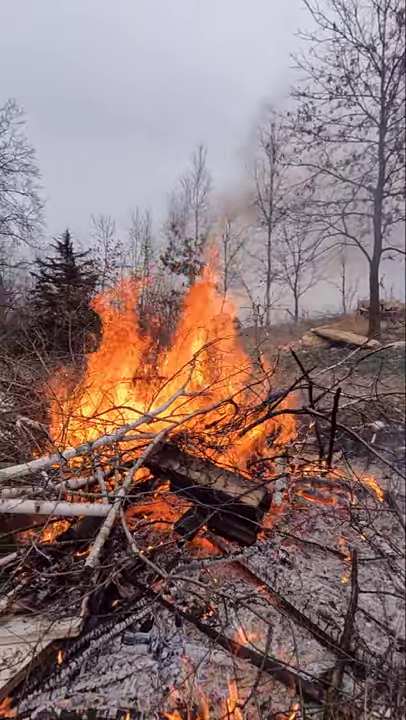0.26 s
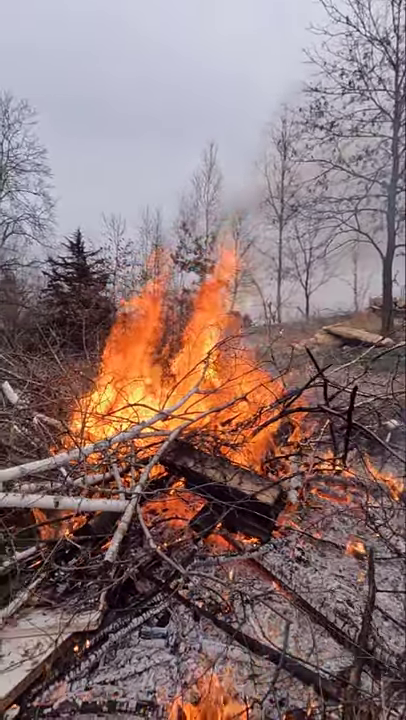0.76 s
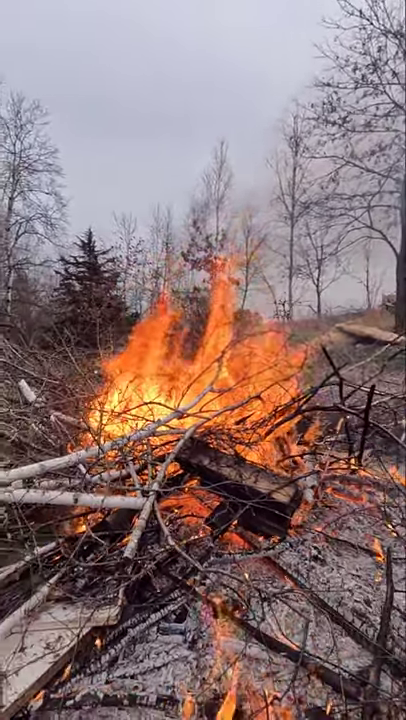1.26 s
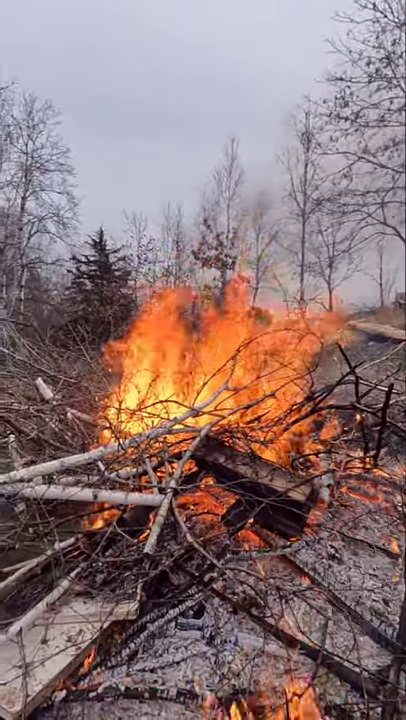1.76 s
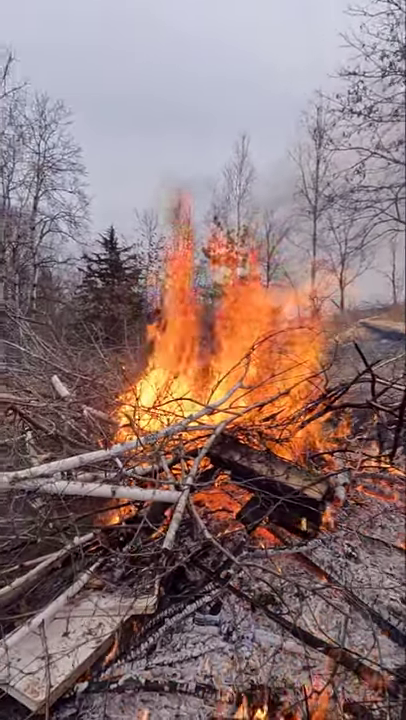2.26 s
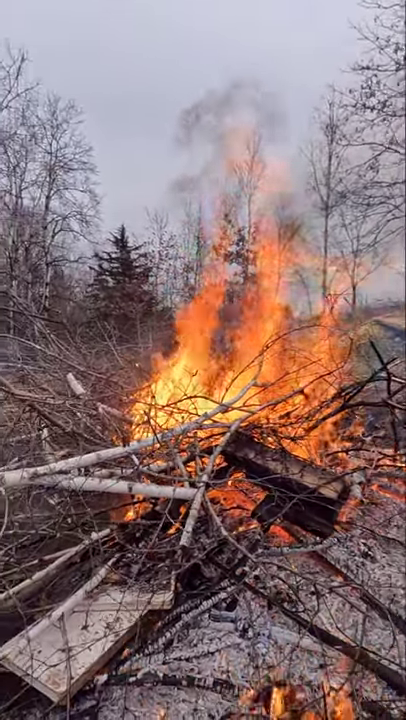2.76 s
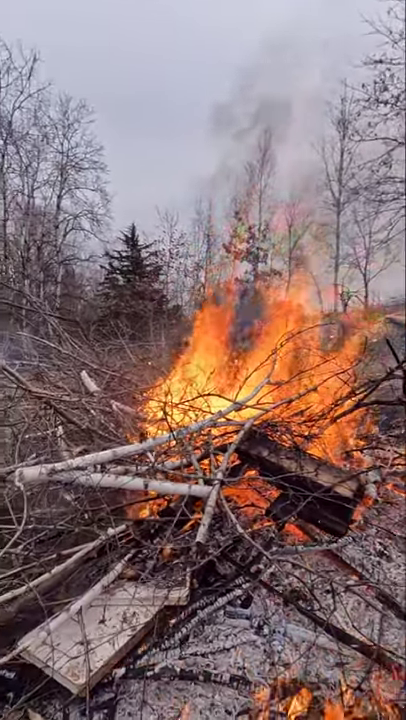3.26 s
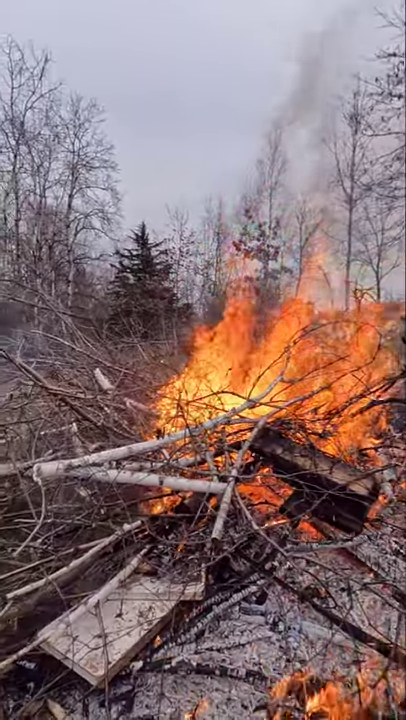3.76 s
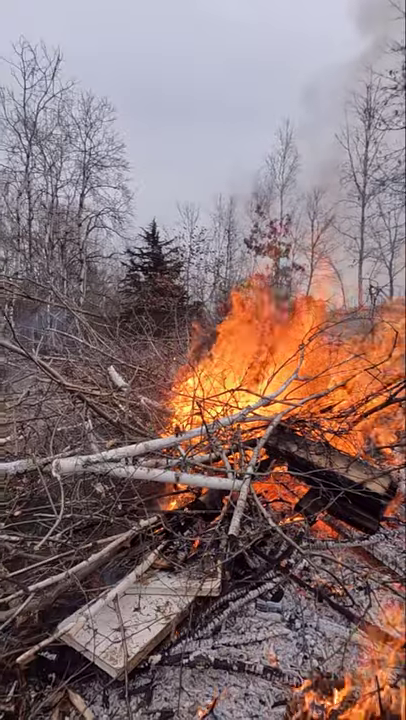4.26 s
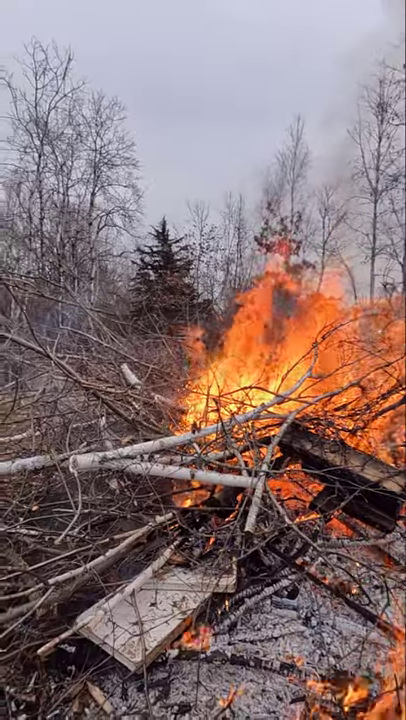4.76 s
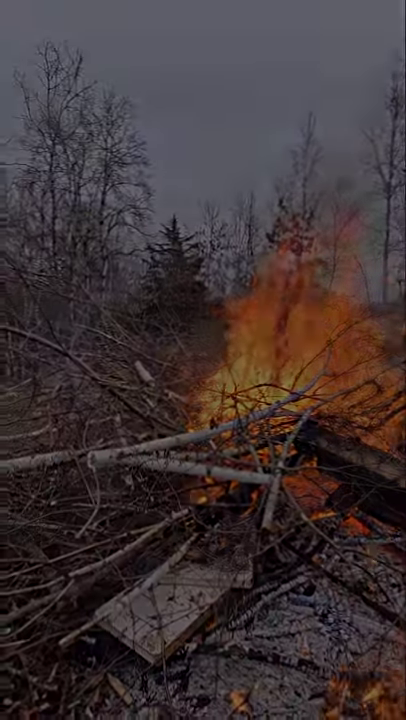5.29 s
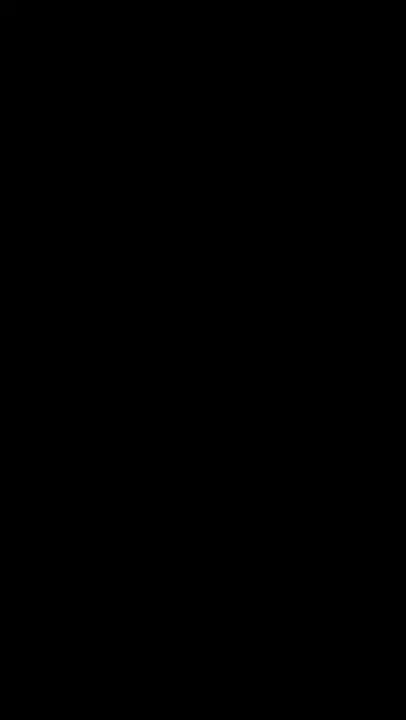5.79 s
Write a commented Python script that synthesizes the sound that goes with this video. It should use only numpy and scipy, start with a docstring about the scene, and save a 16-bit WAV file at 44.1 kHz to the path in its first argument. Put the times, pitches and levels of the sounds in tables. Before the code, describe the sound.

A big heap of cut branches burns in the open, heard from a few metres on a small camera microphone. The flames rush and flutter low and steady while sap hisses softly and twigs tick. Sharp pops burst from the wood several times a second, the louder ones with a small thud and a spitting tail. Steam sputters briefly early on, and the popping grows busiest in the second half.

```python
"""In the open, a few metres from a burning heap of cut branches, on a small camera's microphone.
Pockets of gas burst in the wood: sharp pops with a thud, a spitting tail and an echo off the ground.
The flames rush and flutter in the bass, sap hisses, twigs tick and steam sputters.
Faint thin tones come and go near 10-11 kHz. The microphone port rings near 4 kHz and dips near 9 kHz;
the gain ducks after loud pops. The sound loops after about 4.7 s."""
import sys
import numpy as np
from scipy import signal
from scipy.fft import rfft, irfft, next_fast_len
from scipy.io import wavfile
from scipy.ndimage import uniform_filter1d, minimum_filter1d, map_coordinates

SR = 44100
rng = np.random.default_rng(int(sys.argv[2]) if len(sys.argv) > 2 else 0)


def wav_record(signal):
    """Record a signal, one row per channel, as 16-bit PCM in the file named by sys.argv[1]."""
    frames = np.transpose(np.atleast_2d(signal))
    bounded = np.clip(frames, -1, 1)
    # unit amplitude maps onto the largest positive 16-bit level
    quanta = np.round(bounded * 32767).astype(np.int16)
    wavfile.write(sys.argv[1], SR, quanta)


N = 265923

# gas pockets bursting: t/s, shock level/dB, sharpness/dB, spit level/dB, thud level/dB
BURSTS = [(.0203, -13, 2, -32, -31.5), (0.0663, -36, -6, -44, -53), (0.109, -38, 0, -44, -53),
          (0.211, -35, 7, -62, -40), (0.236, -36, 9.5, -45.5, -39), (0.3558, -9, 0.5, -35, -25.5),
          (0.3567, -19, -1.5, -29, -47), (.403, -49, 3, -37, -42), (0.4987, -27.5, -9.5, -53, -57),
          (0.5363, -27, 8, -44, -30), (0.6911, -7.5, -6.5, -25, -35), (0.6947, -18.5, 8, -33, -26),
          (0.729, -30, -1, -54, -54), (0.7799, -12.5, 5, -39, -23.5), (0.855, -27, 7, -40.5, -55),
          (0.9076, -27.5, 9, -42, -62), (1.0043, -21.5, 10, -35.5, -52), (1.0243, -24.5, 3, -38, -46),
          (1.1246, -30, -10, -51, -33), (1.146, -27.5, 9, -45, -47), (1.1753, -26, 6.5, -48, -57),
          (1.6601, -20, 6.5, -35, -30), (1.79, -15.5, -7, -33, -22.5), (1.6755, -29, 13.5, -45, -53),
          (1.76, -33, 10, -41.5, -45), (1.8316, -25, 6, -34.5, -62), (1.9026, -16, 8, -39, -53),
          (1.924, -25.5, 7.5, -35, -68), (1.9992, -28.5, 5, -43, -67), (2.024, -32, 5, -40, -54),
          (2.042, -32, 9.5, -55, -50), (2.066, -27, 8, -45, -53), (2.0854, -32, 7.5, -58, -59),
          (2.136, -23.5, 12, -39, -34), (2.1453, -15.5, 6.5, -51, -39), (2.195, -30.5, 11, -38.5, -47),
          (2.334, -14, 2.5, -34.5, -70), (2.4147, -18, 1, -45, -67), (2.449, -30.5, -4, -40, -46),
          (2.5219, -31, 4, -30, -55), (2.567, -25.5, -10, -38.5, -49), (2.616, -17.5, -5.5, -42, -44),
          (2.622, -26, 11, -43, -50), (2.665, -51, -6, -39.5, -63), (2.6956, -16.5, 5, -32, -32.5),
          (2.728, -27.5, -11, -36, -44), (2.7916, -24, -9, -46, -52), (2.8443, -11.5, 2, -29, -36),
          (2.879, -15.5, -3, -29.5, -36), (2.883, -21, 16, -41, -55), (2.9382, -15, -1, -33, -59),
          (2.9617, -28, 4, -43, -51), (3.0419, -22, 3, -33, -46), (3.0876, -22.5, -3, -43, -56),
          (3.1196, -17.5, -4, -35, -43), (3.142, -25.5, 4, -50, -57), (3.1595, -30.5, 2, -40, -58),
          (3.239, -32, -15, -37, -54), (3.2803, -13, -2, -36, -21), (3.315, -25, -5, -39, -48),
          (3.3496, -25, -9, -39.5, -53), (3.3948, -24, 9.5, -42.5, -56), (3.4356, -20.5, -0.5, -35, -33),
          (3.459, -17.5, 1, -39, -29), (3.4807, -20, 2.5, -55, -31), (3.5117, -29, 2, -30.5, -44),
          (3.519, -20.5, -2, -44, -32), (3.53, -25.5, 15, -42, -46), (3.5513, -23, 3.5, -41, -39),
          (3.593, -13, 9.5, -25, -31), (3.6162, -26.5, -12, -52, -54), (3.632, -27, 0, -32, -49),
          (3.6574, -25.5, 9, -36.5, -32), (3.673, -7.5, 1.5, -28, -31), (3.762, -38, 2, -36.5, -48),
          (3.811, -26, -1, -55, -51), (3.8582, -18, 2, -34.5, -35), (3.9367, -14.5, 4.5, -37, -21.5),
          (3.981, -21, 7.5, -34, -30), (4.035, -9, -4, -40, -20.5), (4.1203, -34, -19, -42, -47),
          (4.184, -32, -7, -65, -100), (4.216, -39, 11.5, -33.5, -68), (4.301, -32.5, 8, -58, -64),
          (4.4071, -26, 7.5, -41, -28), (4.4175, -27, -9, -47, -55), (4.5081, -26, 8.5, -45, -58),
          (4.524, -30.5, 6, -63, -51), (4.644, -22.5, 10, -33.5, -47)]
# how hard the heap burns: t/s, roar level/dB, hiss level/dB
FIRE_LEVELS = [(0.0, -38, -54.5), (0.92, -40, -54), (1.5, -39.5, -54), (1.96, -38, -53.5), (2.31, -42, -53),
               (2.68, -41.5, -51.5), (3.18, -38.5, -51.5), (3.51, -38, -51), (3.73, -39, -52.5),
               (4.72, -39, -54)]
# spectrum of the burning gas: f/Hz, level/dB
ROAR_SPECTRUM = [(25, -17.5), (87, -1.5), (120, 0.5), (308, -1), (426, -8.5), (600, -11), (800, -28),
                 (1500, -49.5)]
# spectrum of the hissing sap: f/Hz, level/dB
HISS_SPECTRUM = [(400, 10), (800, 21), (2000, 12), (4000, 7.5), (7000, 3), (11000, 0.5), (13000, -12),
                 (13900, -60)]
# the brief ring after a pop of sharpness 0: f/Hz, level against the shock/dB
POP_RING = [(1800, -11), (3800, -9)]
# steam from fresh splits: t/s, level/dB, time to fall 60 dB/s
STEAM_JETS = [(0.724, -34.5, 0.35), (3.71, -44.5, 0.2)]
# spectrum of those jets: f/Hz, level/dB
STEAM_SPECTRUM = [(700, -30), (1900, 3), (3900, 10), (9000, -18)]
# faint gliding tones: start t/s, end t/s, first f/Hz, last f/Hz
THIN_TONES = [(0, .09, 10950, 11200), (1.007, 1.147, 10150, 10300), (3.57, 4.2, 11080, 10900),
              (4.15, 4.56, 10900, 11150)]
# stereo width at the microphone: f/Hz, side gain/dB
SIDE_GAIN = [(100, -76.5), (1000, -44), (4400, -37.5), (9500, -20), (11300, -4)]

POP_HZ, EDGE_HZ = 3647, 9500  # body of a burst of sharpness 0; its sharper front
RING_T60_S, SPIT_T60_S = 0.005, 0.052
SPIT_HZ, SPRAY_DB = 3600, -8  # the spray is the broad noise under the pitched spit
PORT_HZ, PORT_WIDTH_HZ, PORT_DB = 3800, 1400, -4
DIP_HZ, DIP_WIDTH_HZ = 8780, 1130
TREBLE_CUT_HZ, TREBLE_CUT_DB, TOP_HZ = 13500, -27, 16650
LOOP_S = 283 / 60


def pops():
    """Gas bursts in the wood: a shock, higher when sharp, a short ring, a thud, then gas spitting out."""
    out = np.zeros((2, N + SR))
    t = np.arange(-SR // 100, SR // 12) / SR
    after = np.maximum(t, 0)
    for onset, shock_db, sharp_db, spit_db, thud_db in BURSTS:
        hz = np.clip(POP_HZ * amp(.5 * sharp_db), 900, 9000)
        edge_luck, push_luck, detune, pan = rng.standard_normal(4)
        edge = amp(-20 + 0.7 * sharp_db + 3 * edge_luck) * shock(t, EDGE_HZ, swings=.5)
        push = amp(-12.5 - 0.074 * sharp_db + 2 * push_luck) * shock(t, 0.29 * hz)
        crack = shock(t, hz) + edge + push + pop_ring(after, sharp_db, detune)
        blow = amp(shock_db) * crack + amp(thud_db) * thud(after)
        start = round((onset + t[0]) * SR)
        out[:, start:start + len(t)] += np.outer([1, pan], blow) + amp(spit_db) * spit(after, hz)
    return out[:, :N]


def shock(t, hz, swings=0.56):
    """A pressure pulse, mostly inward then outward, about one swing at hz, centred on t = 0."""
    cycles = t * hz
    return np.sin(2 * np.pi * cycles - .75) * np.exp(-(cycles / swings) ** 2)


def pop_ring(t, sharp_db, detune):
    """A brief ring near 1.8 and 3.8 kHz after a pop: stronger on dull pops, higher on sharp ones."""
    mode_hz, mode_db = np.transpose(POP_RING)[..., None]
    db = mode_db + 3 * rng.standard_normal(mode_db.shape) - 0.3 * sharp_db
    hz = mode_hz * amp(0.5 * max(sharp_db, 0) + 0.5 * detune)
    return np.sum(amp(db - 60 * t / RING_T60_S) * np.sin(2 * np.pi * hz * t), axis=0)


def thud(t):
    """A heavy burst shoves the air, a slow swing or two, and knocks the log."""
    shove = np.sin(2 * np.pi * 270 * t) * np.exp(-((t - .0018) / 0.0025) ** 2)
    knock = amp(6 - 60 * t / 0.003) * np.sin(2 * np.pi * 560 * t)
    return shove + knock


def spit(t, pop_hz):
    """Gas spits out after a burst: gritty noise that drops fast, then lingers."""
    fade = amp(-60 * (t / SPIT_T60_S) ** .75) * (t > 0)
    hz = max(pop_hz, SPIT_HZ)
    band = signal.butter(2, [0.5 * hz, 1.45 * hz], btype="band", fs=SR)
    grit = gritty(len(t), lumps_db=4)
    return fade * (unit(signal.lfilter(*band, grit)) + amp(SPRAY_DB) * grit)


def ground_echo(x, delay_s=.0037, db=-18):
    """The direct sound plus the weaker, duller copy that the ground sends back."""
    echo = filtered(x, lambda hz: amp(db) * np.exp(-2j * np.pi * hz * delay_s) / (1 + 1j * hz / 6000))
    return x + echo


def flames(flicker_hz=6000, flicker_db=2.5):
    """Burning gas roars and sap hisses; the treble of the hiss flickers on its own."""
    times, roar_db, hiss_db = np.transpose(FIRE_LEVELS)
    t = np.arange(N) / SR
    roar = amp(np.interp(t, times, roar_db)) * rush(ROAR_SPECTRUM)
    hiss = amp(np.interp(t, times, hiss_db) + 1.2 * wobble(5.8)) * rush(HISS_SPECTRUM)
    treble = filtered(hiss, lambda hz: 1 / (1 + (flicker_hz / (hz + 1)) ** 4))
    return roar + hiss + treble * (amp(flicker_db * wobble(35)) - 1)


def twigs(count=2600, over_hiss_db=4, spread_db=3.6):
    """Small twigs tick in clumps, mostly faintly; the louder the hiss, the more they stand out."""
    when, size, pitch, pan = rng.random((count, 4)).T
    t = np.arange(-40, 40) / SR
    times, _, hiss_db = np.transpose(FIRE_LEVELS)
    starts = (when * N).astype(int)
    clumps_db = 2.5 * wobble(14) + 2.5 * wobble(70)
    busy_db = 2.8 * (np.interp(starts / SR, times, hiss_db) - hiss_db.mean())
    size_db = over_hiss_db - spread_db * np.log(1 - .98 * size)
    tick_db = hiss_db.mean() + busy_db + size_db + clumps_db[starts]
    ticks = amp(tick_db)[:, None] * shock(t, 1800 * amp(13 * pitch[:, None]), swings=0.6)
    return np.array([lay(starts, ticks), lay(starts, ticks * np.sign(pan[:, None] - .5))])


def steam():
    """Jets of steam sputter from fresh splits and die away."""
    t = np.arange(N) / SR
    jets = sum(amp(db - 60 * np.maximum(t - onset, 0) / t60) * (t >= onset)
               for onset, db, t60 in STEAM_JETS)
    grit = gritty(N, lumps_db=5) * amp(3.5 * wobble(150))
    return jets * unit(shaped(grit, STEAM_SPECTRUM))


def thin_tones(level_db=-67.5):
    """Faint, thin, wavering tones glide near 10-11 kHz, dead centre."""
    t = np.arange(N) / SR
    out = np.zeros(N)
    for start, end, first_hz, last_hz in THIN_TONES:
        progress = np.clip((t - start) / (end - start), 0, 1)
        hz = first_hz + (last_hz - first_hz) * progress + 45 * wobble(220)
        swell = np.sqrt(np.sin(np.pi * progress)) * amp(level_db + 3 * wobble(30))
        out += swell * np.sin(2 * np.pi * np.cumsum(hz) / SR)
    return out * [[1], [0]]


def rush(spectrum, patchy_db=1.2):
    """Two unrelated noises that share patches of random gain in time and pitch, at rms 1."""
    cells = signal.stft(rng.standard_normal((2, N)), nperseg=512)[2]
    patches = uniform_filter1d(rng.standard_normal(cells.shape[1:]), size=8, axis=0)
    patches = uniform_filter1d(patches, size=6, axis=1)
    pair = signal.istft(cells * amp(patchy_db * unit(patches)), nperseg=512)[1][:, :N]
    return unit(shaped(pair, spectrum))


def gritty(length, lumps_db):
    """Two noises made of short lumps of unequal size."""
    lumps = uniform_filter1d(rng.standard_normal(length), size=40)
    return unit(rng.standard_normal((2, length)) * amp(lumps_db * unit(lumps)))


def amp(db):
    """dB to gain."""
    return 10 ** (np.asarray(db) / 20)


def unit(x):
    """x at rms 1."""
    return x / np.sqrt(np.mean(x ** 2) + 1e-20)


def wobble(rate):
    """A smooth random curve, rate knots a second."""
    knots = rng.standard_normal(int(N * rate / SR) + 4)
    return map_coordinates(knots, [np.arange(N) * rate / SR])


def filtered(x, response):
    """x through a complex frequency response."""
    size = next_fast_len(N + SR // 2)
    return irfft(rfft(x, size) * response(np.fft.rfftfreq(size, 1 / SR)), size)[..., :N]


def shaped(x, spectrum):
    """x through a curve of (f/Hz, level/dB) points on a log frequency axis."""
    f, db = np.transpose(spectrum)
    return filtered(x, lambda hz: amp(np.interp(np.log(hz + 1), np.log(f + 1), db)))


def lay(starts, sounds):
    """Sum rows of sound that begin at the given samples."""
    at = starts[:, None] + np.arange(sounds.shape[1])
    return np.bincount(at.ravel(), sounds.ravel(), N + sounds.shape[1])[:N]


def scene():
    """The fire from a few metres: mid and side rows become left and right, wide only in the treble."""
    mid, side = flames() + ground_echo(pops()) + steam() + thin_tones() + twigs()
    side = shaped(side, SIDE_GAIN)
    return np.array([mid + side, mid - side])


def port(f):
    """The microphone port: one resonance and one dip."""
    band = lambda centre, width: 1j * f * width / (centre ** 2 - f ** 2 + 1j * f * width)
    ring = 1 + amp(PORT_DB) * band(PORT_HZ, PORT_WIDTH_HZ)
    dip = 1 - band(DIP_HZ, DIP_WIDTH_HZ)
    return ring * dip


def roll_off(f):
    """The treble falls away steeply above about 13.5 kHz, and the deep bass thins out."""
    shelf = amp(TREBLE_CUT_DB * np.clip((f - TREBLE_CUT_HZ) / 1200 + .5, 0, 1))
    return shelf * (1j * f / (40 + 1j * f)) ** 2


def duck(x, threshold_db=-14, smooth_s=0.053):
    """The camera's gain drops for a moment after loud peaks."""
    peak_db = 20 * np.log10(np.abs(x).max(axis=0) + 1e-9)
    over_db = np.maximum(peak_db - threshold_db, 0)
    held_db = -minimum_filter1d(-over_db, size=441, origin=220)  # 10 ms peak hold
    pole = np.exp(-1 / (SR * smooth_s))
    return x * amp(-1.5 * signal.lfilter([1 - pole], [1, -pole], held_db))


def record(dry):
    """Microphone port colour, roll-off, ducking gain and rounded peaks, then the loop and a band limit."""
    x = duck(filtered(dry, lambda hz: port(hz) * roll_off(hz)))
    x = x / (1 + np.abs(x / .5) ** 6) ** (1 / 6)  # soft ceiling at 0.5
    looped = x[:, np.arange(N) % round(LOOP_S * SR)]
    return filtered(looped, lambda hz: hz < TOP_HZ)


dry = scene()
out = record(dry)
wav_record(out)
```